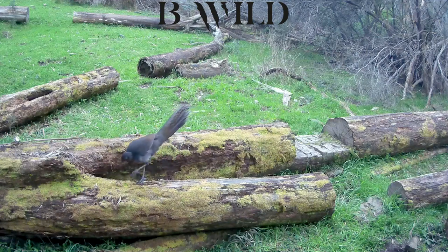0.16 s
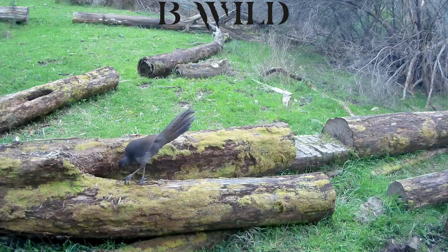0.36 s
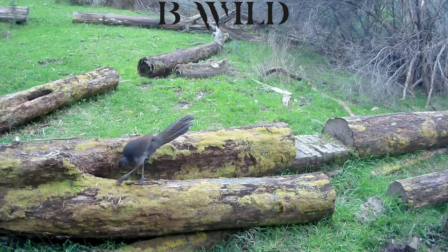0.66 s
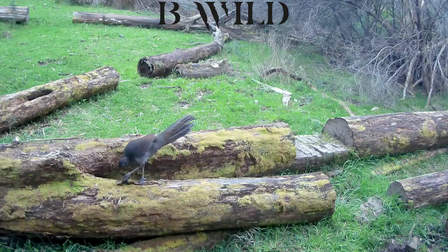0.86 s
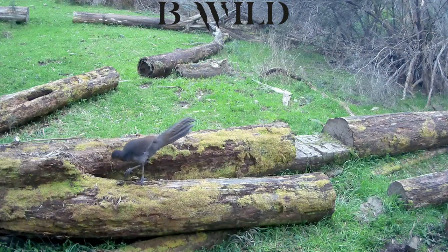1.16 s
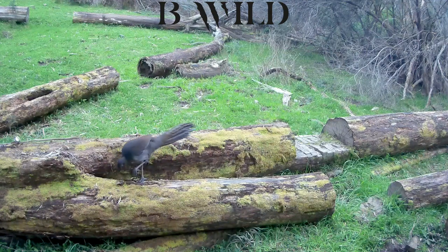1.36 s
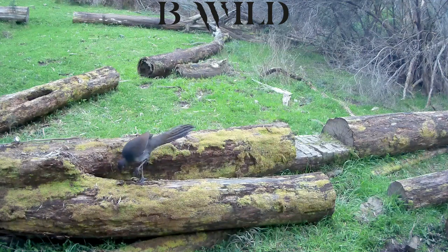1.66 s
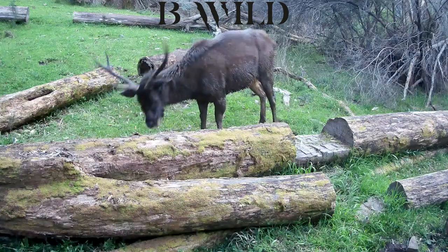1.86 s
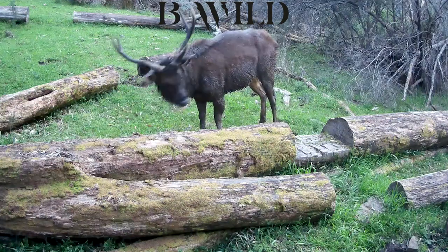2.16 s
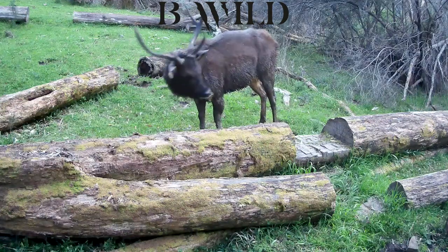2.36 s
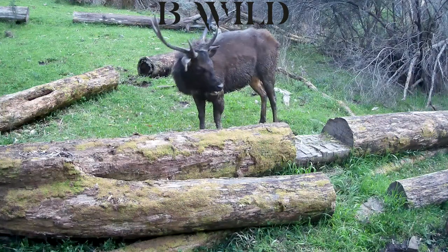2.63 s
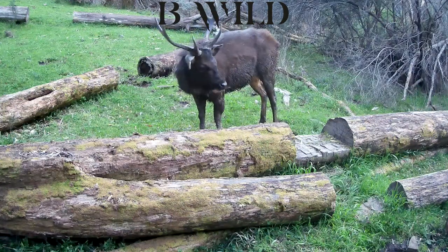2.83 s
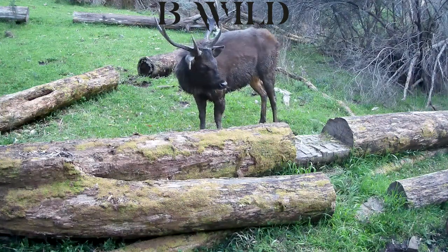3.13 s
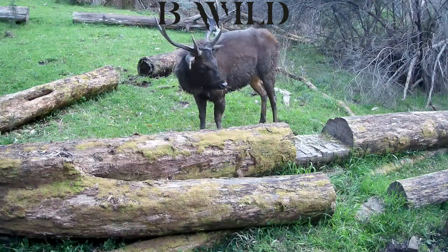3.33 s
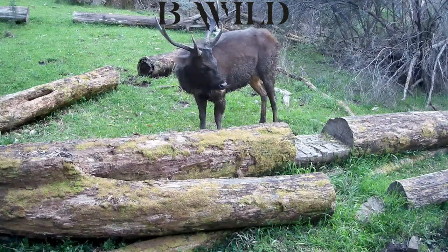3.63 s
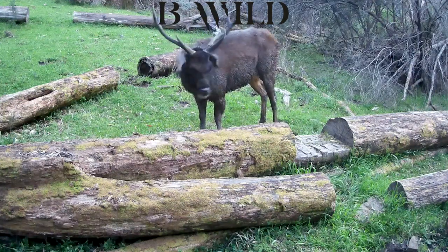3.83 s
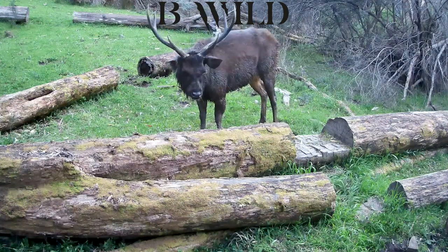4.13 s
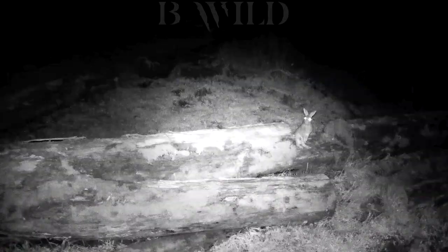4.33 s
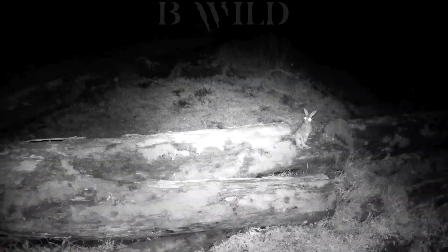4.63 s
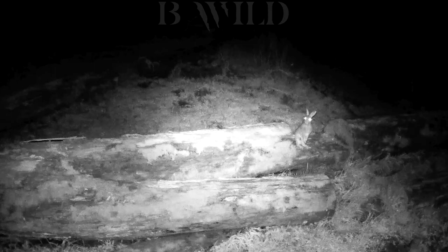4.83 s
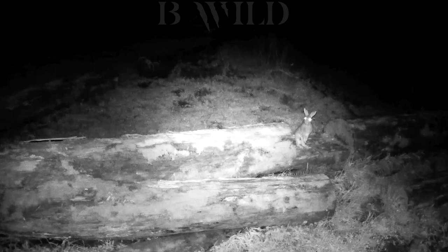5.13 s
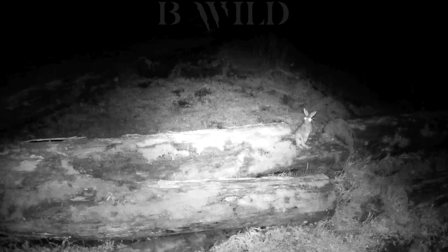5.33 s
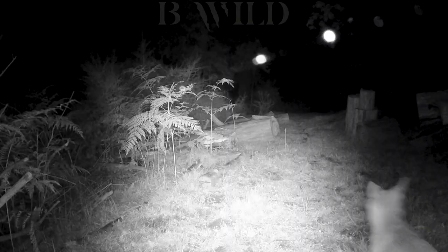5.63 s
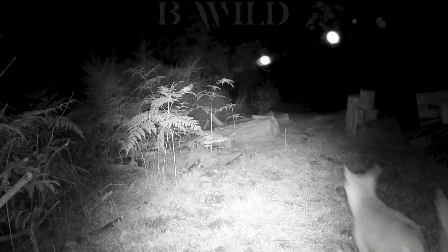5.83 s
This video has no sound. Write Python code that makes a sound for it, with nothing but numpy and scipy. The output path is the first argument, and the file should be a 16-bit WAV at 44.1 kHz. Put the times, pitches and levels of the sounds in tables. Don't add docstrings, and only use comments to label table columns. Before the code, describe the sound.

Quiet hissy daytime air, a fast crescendo of echoing rising bird whistles among small twitters, then sudden darkness with water, frogs and drips.

```python
import sys
import numpy as np
from scipy import signal
from scipy.fft import rfft, irfft
from scipy.io import wavfile
from scipy.ndimage import uniform_filter1d

SR = 44100
rng = np.random.default_rng(int(sys.argv[2]) if len(sys.argv) > 2 else 0)


def int16_out(signal):
    q = np.round(np.clip(np.atleast_2d(signal).T, -1, 1) * 32767)
    wavfile.write(sys.argv[1], SR, q.astype(np.int16))


def natural_amplitude(level_db):
    exponent = np.asarray(level_db, float) / 20
    return 10 ** exponent


N = 264159
t = np.arange(N) / SR
TOP_HZ, CUTOFF_HZ = 12150, 15720
SCENE_CHANGES = [
    1.82,
    4.289,
]


def rms_one(x):
    return x / np.sqrt(np.mean(x ** 2) + 1e-20)


def in_time(rows):
    return np.interp(t, *np.transpose(rows))


def drift(rate):
    r = np.exp(-2 * np.pi * rate / SR)
    settle = 20000
    slow = signal.lfilter([1], [1, -2 * r, r * r], rng.standard_normal(N + settle))
    return rms_one(slow[settle:])


def frequency_response(curve):
    hz, level_db = np.transpose(curve)
    log_hz = np.log(np.arange(N // 2 + 1) * SR / N + 1)
    return natural_amplitude(np.interp(log_hz, np.log(hz), level_db))


def coloured(spectrum):
    return irfft(rfft(rng.standard_normal(N)) * frequency_response(spectrum), N)


def band(x, low_hz, high_hz, order=4):
    return signal.sosfilt(signal.butter(order, [low_hz, high_hz], "band", fs=SR, output="sos"), x)


def wall(x, low_hz, high_hz):
    hz = np.arange(N // 2 + 1) * SR / N
    return irfft(rfft(x) * ((hz >= low_hz) & (hz < high_hz)), N)


def resonance(x, hz, width):
    r = np.exp(-np.pi * width / SR)
    poles = [1, -2 * r * np.cos(2 * np.pi * hz / SR), r * r]
    return signal.lfilter([(1 - r * r) / 2, 0, (r * r - 1) / 2], poles, x)


def double_resonance(x, hz, width):
    return resonance(resonance(x, hz, width), hz, width)


def add(out, start, hz, gain):
    at = round(start * SR)
    out[at:at + len(hz)] += gain * np.sin(2 * np.pi * np.cumsum(hz) / SR)


def dropouts(x):
    gap_spreads = (1.9, 1.05)
    _, s, cells = signal.stft(x, SR, nperseg=1024, noverlap=768)
    chance = uniform_filter1d(rng.standard_normal(cells.shape), size=5, axis=0)
    chance = uniform_filter1d(chance, size=12, axis=1)
    kept = rms_one(chance) < np.where(s < SCENE_CHANGES[0], *gap_spreads)
    return signal.istft(cells * kept, SR, nperseg=1024, noverlap=768)[1][:N]


def microphone_hiss(song):
    # f/Hz, level/dB per Hz
    first_air = [(12, -35), (20, -4.5), (124, -1.5), (269, -8), (300, -8), (343, -9), (745, -12.5),
                 (830, -12.5), (3340, -18), (11200, -18.5), (12100, -22.5), (15700, -52), (22000, -120)]
    # f/Hz, level/dB per Hz
    second_air = [(120, -3), (200, -13), (411, -13), (560, -15), (987, -16), (2140, -16), (2490, -15.5),
                  (2630, -16), (12100, -20.5), (15700, -50), (22000, -120)]
    before = t < SCENE_CHANGES[0]
    duck_db, duck_from_db, duck_hold_s = 0.1, -35, 0.19
    song_db = 10 * np.log10(uniform_filter1d(song ** 2, round(duck_hold_s * SR)) + 1e-12)
    hiss_db = np.where(before, -53.5, -58) + 0.78 * drift(13)
    top_db = np.where(before, -54, -55.0) - duck_db * np.maximum(song_db - duck_from_db, 0)
    top_db = top_db + 0.98 * drift(9.3)
    first, second = coloured(first_air), coloured(second_air)
    first /= np.std(wall(first, 8500, 11800))
    second /= np.std(wall(second, 8500, 11800))
    sway_db = 0.19 * drift(31)
    hiss = wall(natural_amplitude(hiss_db - 1.96 + sway_db) * np.where(before, first, second), 0, TOP_HZ)
    top = natural_amplitude(top_db + 3.5 + sway_db) * rms_one(wall(rng.standard_normal(N), TOP_HZ, CUTOFF_HZ))
    return hiss + dropouts(top)


def wind():
    # t/s, level/dB
    gusts = [(0.0, -73), (0.02, -59), (1.64, -45.5), (1.8, -61), (1.82, -66), (1.92, -58), (2.04, -55.5),
             (2.16, -68), (2.36, -61), (2.45, -72), (2.51, -54.5), (3.03, -54.5), (3.47, -48.5),
             (3.67, -52), (3.92, -51.5), (3.99, -50.5), (4.04, -45), (4.28, -62)]
    rumble_db = in_time(gusts) + 3.3 * drift(14)
    white = rng.standard_normal(N)
    rumble = natural_amplitude(rumble_db - 1.5) * rms_one(double_resonance(white, 168, 85))
    deep = natural_amplitude(-33 + 0.4 * rumble_db) * rms_one(band(white, 70, 227, order=1))
    before = t < SCENE_CHANGES[0]
    return rumble * np.where(before, natural_amplitude(-8.5), 1) + deep * ~before


def day(song):
    return microphone_hiss(song) + wind()


def songbook():
    # t/s, length/s, start f/Hz, end f/Hz, level/dB
    chirp = [
        (.172, 0.091, 5580, 4800, -41.5),
        (.178, 0.054, 2780, 2580, -47.5),
        (.235, 0.032, 2540, 2340, -49),
        (.248, 0.026, 5270, 5020, -47),
        (.255, .04, 4800, 4390, -52),
        (.28, .04, 5100, 4780, -53),
        (.24, 0.045, 3660, 3520, -57),
    ]
    # t/s, length/s, start f/Hz, end f/Hz, level/dB
    slides = [(1.81, 0.15, 2170, 2190, -55.5), (4.14, .15, 1330, 1290, -60), (3.58, 0.085, 1450, 1400, -55),
              (3.2, 0.26, 5820, 5620, -57), (2.93, .2, 5800, 5800, -63), (3.3, .16, 6500, 6480, -58),
              (2.315, 0.035, 4200, 4400, -51), (2.4, 0.041, 3480, 3490, -57),
              (2.955, 0.027, 4560, 4000, -38), (2.972, 0.018, 3780, 4340, -27),
              (2.975, 0.025, 4120, 3600, -31), (2.867, 0.22, 1680, 1550, -48.5),
              (3.116, 0.073, 1510, 2040, -41), (3.44, .1, 8450, 8100, -58.5),
              (4.265, .024, 3280, 3500, -45)]
    # t/s, length/s, f/Hz, level/dB
    seeps = [(2.43, .012, 5870, -54), (2.5, .1, 6150, -63), (2.62, .1, 6165, -58), (2.52, .12, 5650, -67),
             (2.75, 0.12, 5760, -60), (2.76, 0.12, 6600, -60), (2.655, 0.088, 5720, -55),
             (2.885, 0.028, 6740, -51), (2.92, .06, 6070, -53), (3.095, 0.027, 5850, -54),
             (3.14, .03, 5820, -51), (3.229, 0.078, 5745, -53), (3.338, 0.18, 6770, -51),
             (3.348, 0.17, 6690, -53), (3.334, 0.19, 5615, -53.5), (3.57, .06, 5570, -54),
             (3.492, 0.084, 6725, -51), (3.57, 0.074, 6410, -41.5), (3.6, .04, 6735, -46),
             (3.703, .06, 6435, -57), (3.95, .12, 6050, -61), (4.24, .012, 6320, -56)]
    # t/s, level/dB, extra level of second note/dB
    answers = [
        (4.076, -31, -6),
        (4.19, -30.5, -12),
    ]
    # t after start/s, length/s, start f/Hz, end f/Hz, second note/0-1
    answer = [
        (0.0, .044, 2210, 3110, 0),
        (.036, .025, 3110, 3900, 1),
    ]
    # t after start/s, length/s, start f/Hz, end f/Hz, level/dB
    twitter = [
        (0.001, 0.0187, 5600, 6600, -48),
        (.012, .01, 4150, 4610, -52),
        (0.034, 0.011, 3800, 4760, -52),
        (0.038, .008, 5730, 6730, -51),
        (.047, .02, 8160, 6500, -51),
        (0.05, 0.039, 4400, 4065, -41),
    ]
    # t/s, level of loud notes/dB, pitch ratio
    twitters = [
        (1.975, 0.2, 1.001),
        (2.119, -6.5, 1.015),
    ]
    hook_hz = (6800, 6230, 6500)
    sag = 0.0665

    straight = chirp + slides
    straight += [(at, length, hz, hz, db) for at, length, hz, db in seeps]
    for at, db, more_db in answers:
        for s, length, a, b, second in answer:
            straight.append((at + s, length, a, b, db + more_db * second))
    notes = []
    for at, more_db, ratio in twitters:
        notes.append((at + 0.058, .036 / ratio ** 8, *np.multiply(hook_hz, ratio), -33.5 + more_db))
        for s, length, a, b, db in twitter:
            straight.append((at + s, length, a * ratio, b * ratio, db + more_db * (db > -48)))
    for at, length, a, b, db in straight:
        notes.append((at, length, a, (a + b) / 2 - sag * abs(b - a), b, db))
    return notes


def small_birds():
    out = np.zeros(N)
    waver = 1 + .004 * drift(8)
    for start, length, first_hz, mid_hz, last_hz, db in songbook():
        u = np.linspace(-1, 1, round(length * SR))
        bend = (first_hz + last_hz) / 2 - mid_hz
        pitch = mid_hz + (last_hz - first_hz) / 2 * u + bend * u ** 2
        swell = (1 - u ** 2) * (1 + 0.75 * u)
        add(out, start, pitch * waver[round(start * SR):][:len(u)], natural_amplitude(db + 0.5) * swell)
    hoarse = 1 + .3 * drift(300)
    return out * natural_amplitude(1.8 * drift(45)) * hoarse


def rasps():
    # centre t/s, length/s, f/Hz, width/Hz, level/dB
    scolds = [
        (0.231, 0.033, 5070, 250, -44),
        (0.26, 0.055, 4970, 700, -43),
        (2.068, 0.022, 6700, 600, -45),
        (2.332, 0.046, 3260, 500, -50),
        (2.478, 0.051, 3400, 400, -46),
        (2.677, 0.18, 2700, 350, -45),
        (2.98, 0.048, 4030, 600, -42),
        (3.597, 0.052, 6900, 900, -51),
        (4.168, 0.044, 1600, 255, -55),
    ]
    white = rng.standard_normal(N)
    out = np.zeros(N)
    for at, length, hz, width, db in scolds:
        puff = np.exp(-4 * ((t - at) / length) ** 2)
        out += natural_amplitude(db) * puff * rms_one(double_resonance(white, hz, width))
    return out


def thicket(x):
    lag = np.arange(round(.2 * SR)) / SR
    fade = natural_amplitude(-36.5 - 60 * lag / 0.24) * np.minimum(lag / 0.0019, 1)
    sizes = rng.standard_normal(len(lag)) * fade
    return x + irfft(rfft(x) * rfft(sizes, N), N)


def whip_bird():
    # t passing 3 kHz/s, slowness, level/dB, extra level of the top/dB
    whips = [(2.138, .9, -56, -8), (2.2955, 1, -47.5, -12), (2.451, .95, -38, -12), (2.606, 0.83, -26, 6.5),
             (2.766, 0.85, -19, 5), (2.9251, 0.89, -14, 5), (3.087, 0.94, -10.5, 1), (3.247, 0.94, -9, 1),
             (3.4066, 0.99, -8, 1.5), (3.5668, 0.98, -7.5, 3.2), (3.7268, 1.0, -6.5, -7),
             (3.8909, 0.99, -7, -3.5)]
    # t/s, f/Hz
    whip_pitch = [(-.052, 1970), (-.036, 2050), (-.018, 2240), (-.011, 2500), (-.007, 2730), (.003, 3130),
                  (.013, 3400), (.026, 3620), (.045, 3780)]
    # t/s, level/dB
    whip_level = [(-.052, -30), (-.026, -26), (-.015, -21), (-.007, -8), (.003, -5.5), (.016, -2),
                  (.026, -2.5), (.034, -5.5), (.045, -11)]
    out = np.zeros(N)
    pitch_s, pitch_hz = np.transpose(whip_pitch)
    level_s, level_db = np.transpose(whip_level)
    for at, slow, db, top_db in whips:
        u = np.arange(pitch_s[0] * slow, pitch_s[-1] * slow, 1 / SR) / slow
        pitch = uniform_filter1d(np.interp(u, pitch_s, pitch_hz), size=160, mode="nearest")
        low = np.clip((3000 - pitch) / 800, 0, 1.3)
        high = np.clip((u - .026) / .01, 0, 1)
        lead_db = max(3 + 0.44 * (db + 7.5), -14)
        shape_db = np.interp(u, level_s, level_db) + lead_db * low + top_db * high
        soft = signal.windows.tukey(len(u), .14)
        add(out, at + pitch_s[0] * slow, pitch, soft * natural_amplitude(db + shape_db))
    return out * natural_amplitude(.9 * drift(106))


def forest(x):
    echo_s = [0, .008, .016, .03, .06, .095, .108, .2, .45]
    echo_db = [-40, -1, -6, -13, -16, -21.5, -24, -38.5, -42]
    # t/s, level/dB
    banks = [
        (.021, -34),
        (.098, -32),
    ]
    # f/Hz, level/dB
    echo_colour = [(1500, 22), (1950, 12.5), (2200, 15), (2500, 9), (2900, 5), (3300, 5.5), (3700, -8.5),
                   (4500, 0.5)]
    lag = np.arange(round(.45 * SR)) / SR
    sizes = rng.standard_normal(len(lag)) * natural_amplitude(np.interp(lag, echo_s, echo_db) - 31)
    sizes *= natural_amplitude(1.5 * drift(70)[:len(lag)])
    for delay, db in banks:
        sizes[round(delay * SR)] += natural_amplitude(db)
    far = np.clip((lag - .015) / .03, 0, 1)
    near_paths = rfft(sizes * (1 - far), N)
    far_paths = rfft(sizes * far, N) * frequency_response(echo_colour)
    return x + irfft(rfft(x) * (near_paths + far_paths), N)


def grit(song):
    loud = np.sqrt(uniform_filter1d(song ** 2, size=900) + 1e-12)
    noise = rms_one(signal.lfilter([1], [1, -.85], rng.standard_normal(N)))
    return natural_amplitude(-40) * loud ** .5 * wall(noise, 330, TOP_HZ)


def stream():
    # f/Hz, level/dB per Hz
    stream_air = [(12, -69), (20, -28), (90, -20.5), (113, -17.5), (299, -12), (751, -8.5), (1940, -12.5),
                  (2290, -5.5), (2790, -18.5), (3790, -26.5), (5750, -37.5), (6610, -46), (7600, -47),
                  (8500, -48), (15700, -46)]
    air = coloured(stream_air)
    level_db = -41 + 1.28 + 0.67 * drift(5.7)
    return natural_amplitude(level_db) * air / np.std(band(air, 300, 2100))


def frogs():
    # f/Hz, width/Hz, level/dB
    sacs = [
        (2343, 76, 24),
        (2240, 170, -25),
        (2760, 300, -21),
    ]
    # t/s, level/dB
    chorus_level = [(4.3, -46), (4.44, -32), (4.62, -37.5), (4.8, -36), (5.0, -41), (5.3, -38.5),
                    (5.58, -38.5), (5.7, -40), (5.82, -34.5), (5.99, -48)]
    # t/s, level/dB
    high_level = [(4.3, -60), (4.42, -72), (4.85, -72), (5.02, -64), (5.4, -66), (5.56, -58), (5.66, -65),
                  (5.86, -62), (5.99, -66)]
    clicks = (rng.random(N) < 4000 / SR) * rng.standard_normal(N) * natural_amplitude(0.33 * drift(35))
    chorus = sum(natural_amplitude(db) * rms_one(double_resonance(clicks, hz, width)) for hz, width, db in sacs)
    high = rms_one(resonance(resonance(clicks, 4200, 170), 4230, 220))
    chorus_db = in_time(chorus_level) - 6.0 + 1.0 * drift(14)
    return natural_amplitude(chorus_db) * rms_one(chorus) + natural_amplitude(in_time(high_level) + 1) * high


def crickets(white):
    first_s, every_s, length_s = 4.344, .1692, .055
    beat = ((t - first_s) / every_s + .5) % 1 - .5
    chirps = np.exp(-4 * (beat * every_s / length_s) ** 2)
    return natural_amplitude(-66 + 1.3 * drift(3)) * chirps * rms_one(band(white, 5200, 5700, order=2))


def frame_buzz(white, frame_hz):
    gate = np.maximum(np.sin(2 * np.pi * frame_hz * t), 0) ** 3
    return natural_amplitude(-70.0 + 2.0 * drift(7)) * rms_one(band(gate * white, 5460, 5920, order=2))


def whine(frame_hz):
    flips = np.tanh(6 * np.sin(np.pi * frame_hz * t))
    return natural_amplitude(-65.5) * flips * np.sin(2 * np.pi * 7797.5 * t) * (t < 5.965)


def rustles():
    # t/s, level/dB, length/s
    ticks = [
        (5.03, -68, .03),
        (5.9, -67, .012),
        (5.925, -65, .008),
        (5.95, -68, .02),
    ]
    shape = sum(natural_amplitude(db) * np.exp(-((t - at) / length) ** 2 * 4) for at, db, length in ticks)
    return shape * rms_one(band(rng.standard_normal(N), 8200, 11500, order=2))


def drips():
    # t/s, peak level/dB, f/Hz
    drops = [
        (5.4435, -24, 2580),
        (5.5897, -20.5, 1620),
    ]
    out = np.zeros(N)
    u = np.arange(round(.03 * SR)) / SR
    for at, db, hz in drops:
        decay = natural_amplitude(db - 3.5 - 60 * u / .03)
        add(out, at, hz * (1 + 4.5 * u), decay * np.minimum(u / 0.00045, 1))
    return out


def night():
    frame_hz = 59.3
    white = rng.standard_normal(N)
    animals = frogs() + crickets(white)
    electronics = frame_buzz(white, frame_hz) + whine(frame_hz)
    return stream() + animals + electronics + rustles() + drips()


def scene():
    song = thicket(small_birds() + rasps()) + forest(whip_bird())
    return np.where(t < SCENE_CHANGES[1], song + grit(song) + day(song), night())[None]


def roll_off(x):
    return signal.sosfilt(signal.butter(12, 16650, fs=SR, output="sos"), x)


def record(dry):
    mix = wall(dry[0], 0, CUTOFF_HZ)[None]
    return roll_off(mix)


dry = scene()
out = record(dry)
int16_out(out)
```